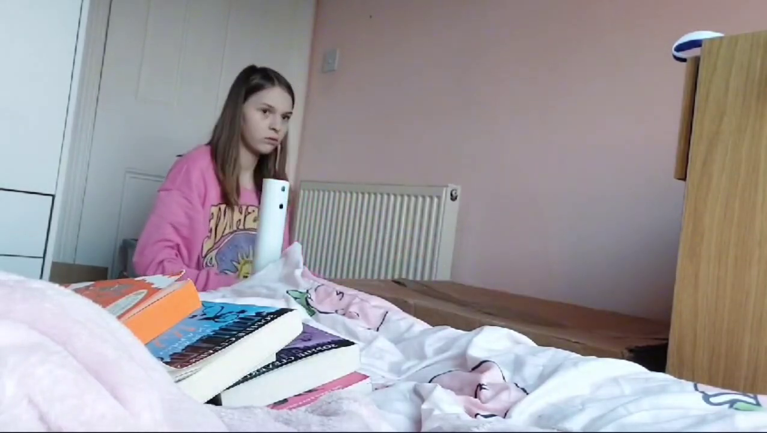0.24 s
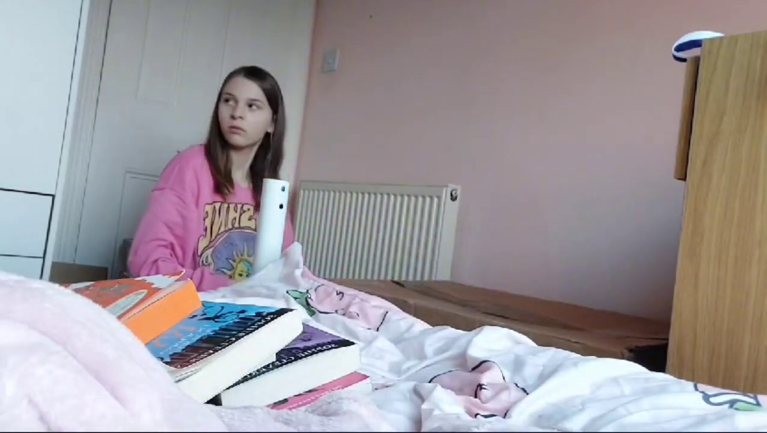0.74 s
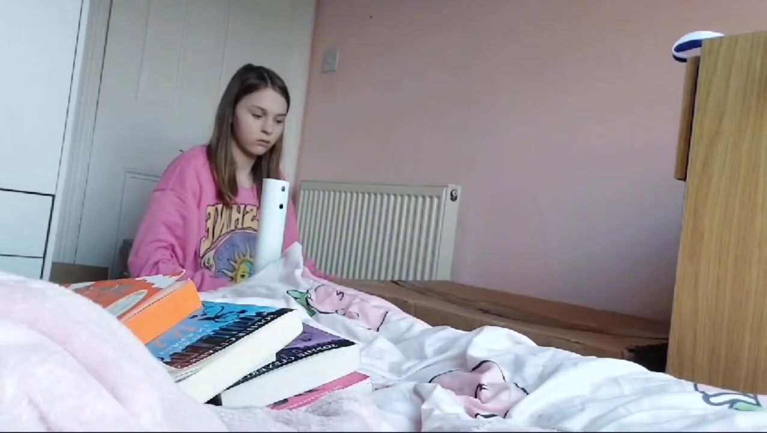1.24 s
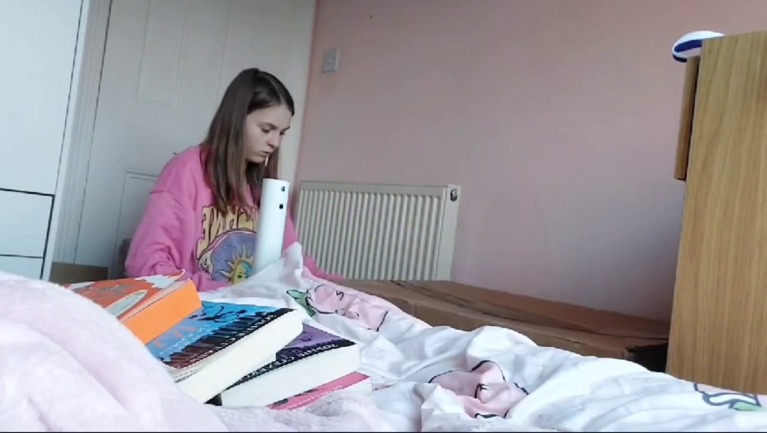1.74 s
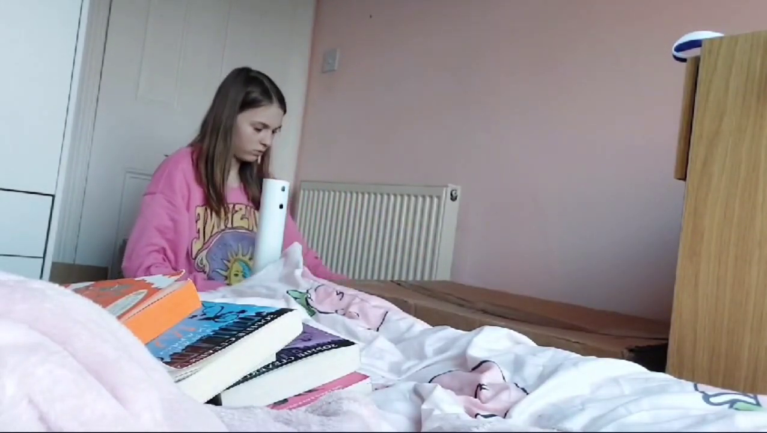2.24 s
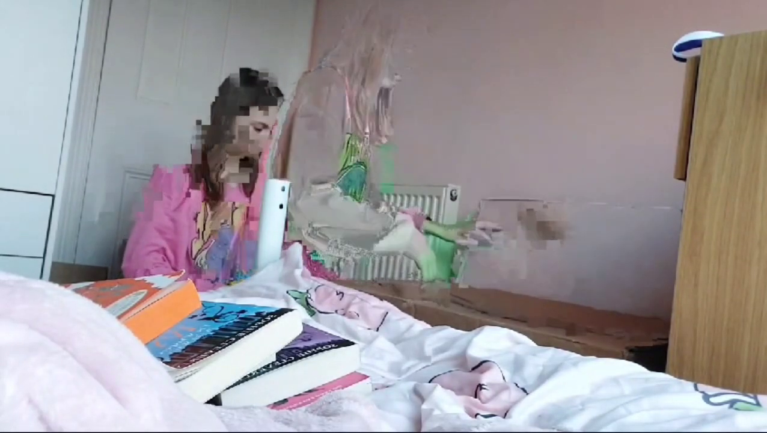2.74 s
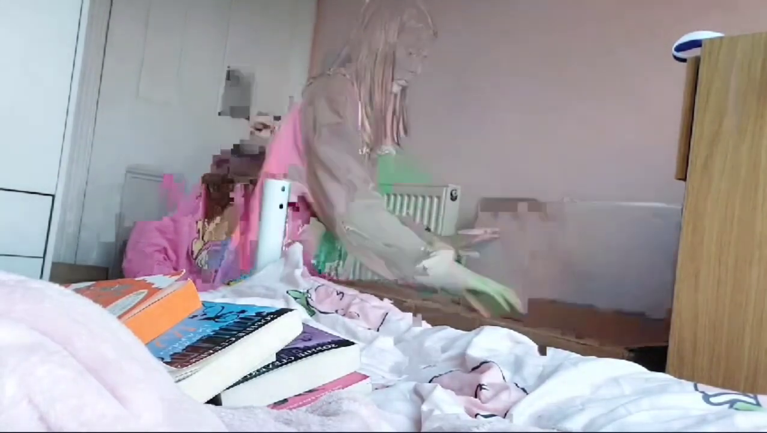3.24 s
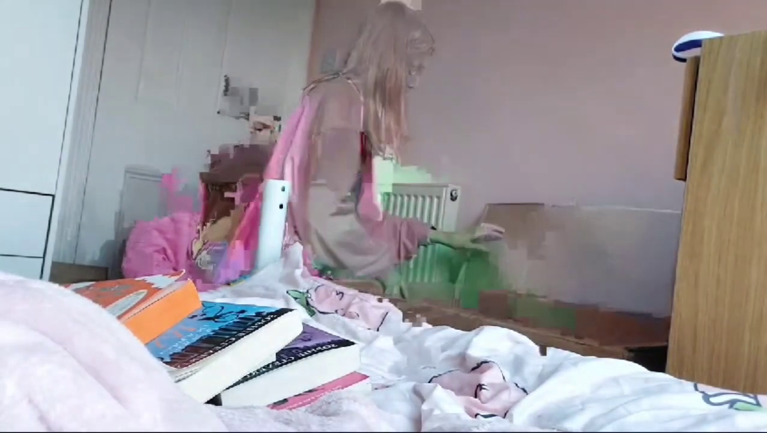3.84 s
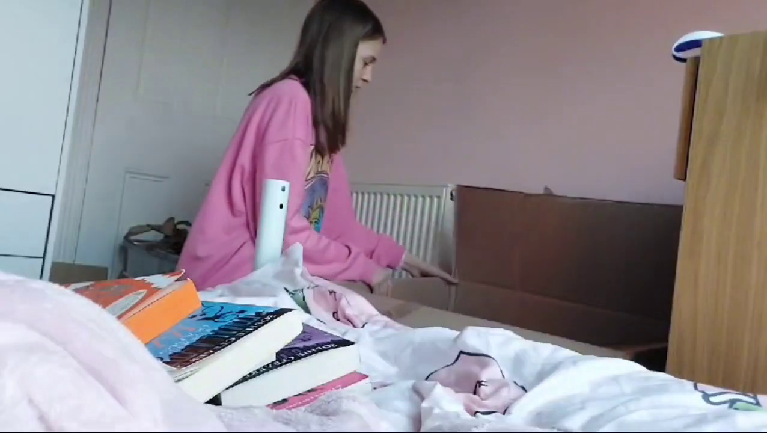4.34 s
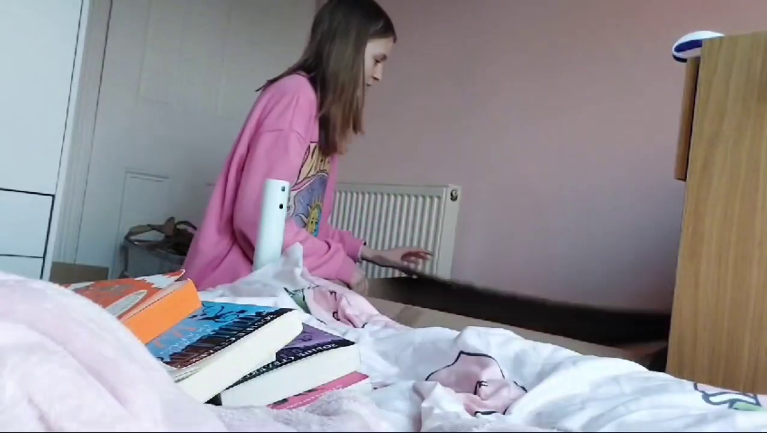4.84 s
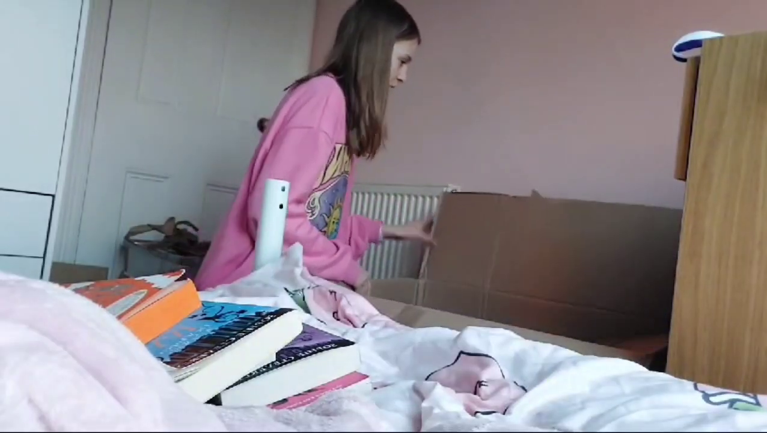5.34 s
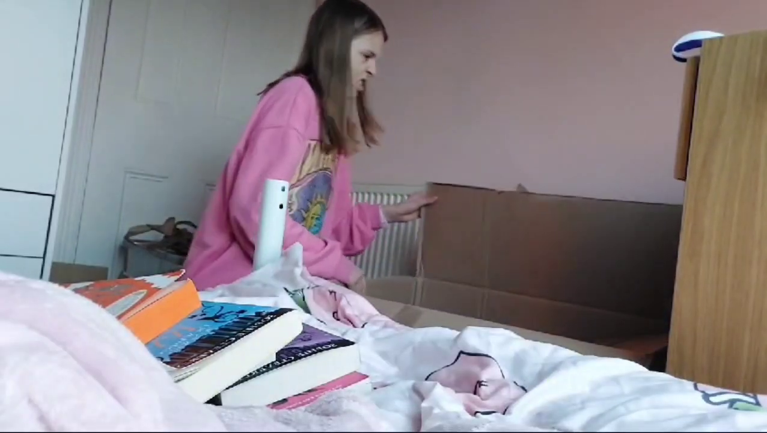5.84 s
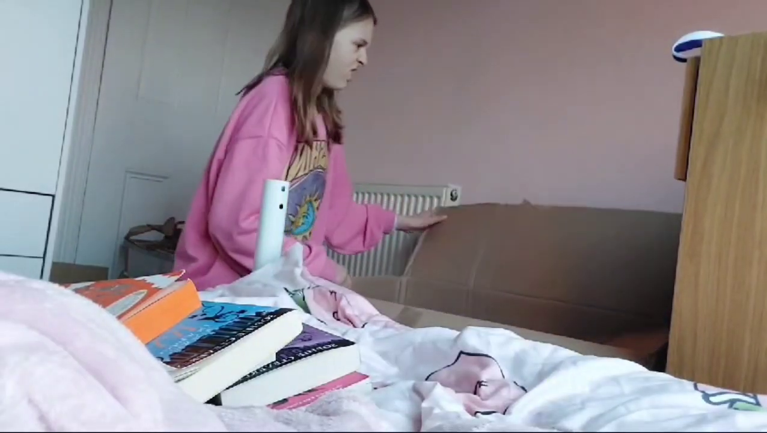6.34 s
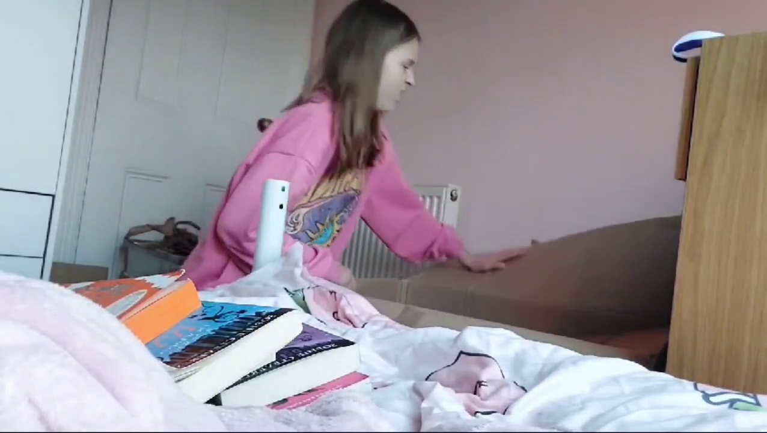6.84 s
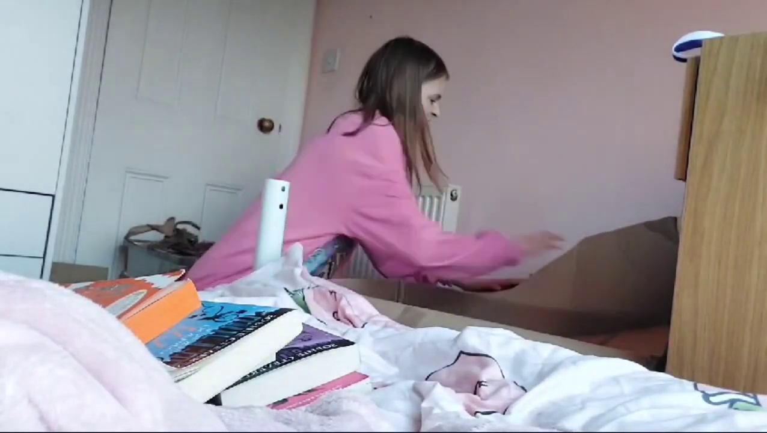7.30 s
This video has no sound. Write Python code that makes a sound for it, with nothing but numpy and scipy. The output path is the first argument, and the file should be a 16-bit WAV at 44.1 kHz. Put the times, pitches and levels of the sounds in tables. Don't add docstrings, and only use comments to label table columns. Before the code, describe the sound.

Close stereo pickup from a bed in a small furnished bedroom. Stiff packing paper is dragged in loud, crackly bursts, with hollow knocks on cardboard, sharp crease snaps and tiny squeaks. The rustling thins to soft shuffles after a couple of seconds. Then palms push and fold large flaps of a box, giving low thumps, dull scrapes and deep air booms, over a faint room hush.

```python
import sys
import numpy as np
from scipy import signal
from scipy.fft import rfft, irfft, next_fast_len
from scipy.io import wavfile
from scipy.ndimage import uniform_filter1d

SR = 44100
rng = np.random.default_rng(int(sys.argv[2]) if len(sys.argv) > 2 else 0)


def pcm_store(signal):
    levels = np.round(np.clip(np.atleast_2d(signal), -1, 1) * 32767)
    wavfile.write(sys.argv[1], SR, levels.astype(np.int16).T)


def volts_from_decibels(level):
    exponent = np.asarray(level, float) / 20
    return 10 ** exponent


N = 333837

SPLICES = [round(s * SR) for s in (1.8315, 2.109, 4.969)]
# peak t/s, flap level/dB, air level/dB, 20 dB rise t/s, 20 dB fall t/s
PULLS = [(0.0, -36.5, -29, 2.5, .1), (.112, -27.5, -38, -0.03, 0.36), (.165, -33, -28, -0.04, 0.2),
         (.24, -20, -30.5, 0.07, 0.15), (.29, -27, -20, 0.03, 0.17), (.33, -30.5, -18, 0.14, 0.2),
         (.525, -16, -32, 0.03, 0.09), (.575, -18.5, -32.5, 0.04, 0.16), (.765, -15.5, -26.5, -0.02, 0.13),
         (.96, -33.5, -30, .03, 0.25), (1.01, -18, -20, -0.02, 0.07), (1.045, -22, -24, -0.03, 0.16),
         (1.122, -15, -26.5, -0.01, 0.08), (1.197, -18, -23.5, -0.03, 0.05), (1.23, -23, -27.5, 0, 0.09),
         (1.45, -41, -41.5, 0.5, 0.6), (1.594, -27.5, -34, 0.23, 0.05), (1.75, -44, -38.5, 0.6, 0.28),
         (1.995, -26.5, -32.5, 0.09, 1), (2.095, -23.5, -24, 0.15, -4)]
FOLDS = [(2.311, -19.5, -25.5, 0.12, 0.14), (2.483, -21, -27.5, 0.022, .16), (2.64, -33, -31, 0.17, 0.092),
         (3.02, -37.5, -29.5, 0.045, 0.1), (3.27, -41, -46, 0.093, .05), (3.16, -49, -43, .05, 0.16),
         (3.314, -20, -11, 0.016, 0.086), (3.359, -37, -12.5, .05, 0.096), (3.56, -48, -42, 0.027, 0.15),
         (3.429, -38, -16.5, 0.15, 0.026), (3.88, -29.5, -26.5, 0.084, 1), (4.13, -30.5, -18.5, 0.13, 0.3),
         (4.22, -27.5, -21.5, 0.043, 0.12), (4.285, -14, -10, 0.023, 0.11), (4.42, -31, -25, 0.033, .15),
         (4.53, -26, -21, .15, 0.23), (4.645, -23.5, -18, 0.1, 0.15), (4.725, -27, -25, .06, .15),
         (4.79, -27.5, -29.5, .2, 0.035)]
PRESSES = [(5.0, -35.5, -26, 0.049, .1), (5.12, -17, -4.5, .06, 0.1), (5.43, -31, -32.5, 0.044, 0.3),
           (5.64, -21, -10, 0.22, 0.11), (5.775, -15.5, -19, 0.033, 0.089), (5.905, -24, -16, .06, 0.15),
           (6.03, -17.5, -10.5, 0.093, 0.11), (6.184, -17.5, -11, 0.022, 0.11),
           (6.52, -21.5, -11, .13, 0.06), (6.6, -22.5, -7, 0.046, 0.23), (6.78, -22, -37, 0.49, .1),
           (6.93, -14.5, -14.5, 0.16, 0.22), (7.065, -15, -22, 0.33, 0.15), (7.3, -31, -47, 0.27, 0.52),
           (7.396, -17.5, -1.5, .003, 0.082), (7.434, -23.5, -2.5, 0.026, 0.011), (7.47, -28, -28, .04, .2),
           (7.57, -20, -16.5, 0.23, .1)]


def evened(x):
    return x / np.sqrt(np.mean(x ** 2) + 1e-20)


def read(points, hz):
    f, value = np.transpose(points)
    return np.interp(np.log(hz + 1), np.log(f + 1), value)


def bins():
    return np.fft.rfftfreq(next_fast_len(N), 1 / SR)


def above(hz, edge_hz):
    return -10 * np.log10(1 + (edge_hz / (hz + 1e-3) + 1e-9) ** 8)


def coloured(x, db):
    size = next_fast_len(N)
    return irfft(rfft(x, size) * volts_from_decibels(db), size)[..., :N]


def resonate(x, hz, width):
    edges = [max(hz - width / 2, 10), min(hz + width / 2, 20000)]
    return signal.sosfilt(signal.butter(1, edges, "band", fs=SR, output="sos"), x)


def add(mix, s, sound):
    start = round(s * SR)
    end = min(k for k in SPLICES + [N] if k > start + 200)
    part = mix[:, start:end][:, :sound.shape[1]]
    part += sound[:, :part.shape[1]]


def slips(per_s, spread_db, smear_s):
    size = volts_from_decibels(spread_db * np.minimum(rng.exponential(1, N), 4)) * (rng.random(N) < per_s / SR)
    keep = np.exp(-1 / (smear_s * SR))
    power = signal.lfilter([1], [1, -keep], size ** 2, zi=[per_s * smear_s * 4])[0]
    return evened(np.sqrt(power + 1e-6) * rng.standard_normal((2, N)))


def patchy(x, patch_db):
    z = signal.stft(x, nperseg=256)[2]
    field = uniform_filter1d(rng.standard_normal(z.shape[1:]), size=5, axis=0)
    field = uniform_filter1d(field, size=14, axis=1)
    return signal.istft(z * volts_from_decibels(patch_db * evened(field)), nperseg=256)[1][:, :N]


def effort(rows, axis, lag_s=0):
    t, rows = np.arange(0, N + 32, 32) / SR, np.array(rows)
    peak = rows[:, :1] + lag_s
    rise, fall = np.maximum(rows[:, -2:].T[..., None], .002)
    db = rows[:, axis, None] - 20 * np.maximum((peak - t) / rise, (t - peak) / fall)
    own = np.searchsorted(SPLICES, t * SR) == np.searchsorted(SPLICES, peak * SR)
    gain = np.sqrt((own * volts_from_decibels(2 * db)).sum(0) + 1e-9)
    return np.interp(np.arange(N) / SR, t, gain)


def sheets():
    # f/Hz, level/dB per Hz
    sheet_colour = [(530, -4.5), (900, 3), (1210, 1), (1960, -0.5), (2970, -9), (3590, -3.5), (3960, -5),
                    (5330, -2.5), (6010, -7), (7270, -4), (9010, -18), (11900, -6), (15600, -11.5)]
    # peak t/s, level/dB, top octave/dB, 20 dB rise t/s, 20 dB fall t/s
    drag_strokes = [(0.0, -31.5, -26, .05, 0.1), (.268, -29, -24, 0.09, 0.08),
                    (.15, -39.5, -41.5, 0, 0.05), (.225, -28.5, -22.5, 0, 0.14),
                    (.36, -42, -36.5, 0.1, 0.1), (.465, -33, -23.5, .025, -0.1), (.503, -30, -26, .03, .2),
                    (.519, -20, -18, .005, 0.31), (.618, -15.5, -24, 0.0552, 0.16),
                    (.768, -23, -23.5, 0.03, 0.13), (.88, -35.5, -35.5, 0.26, .1),
                    (.955, -29, -30, 0.025, 0.1), (1.008, -16, -15.5, .006, 0.08),
                    (1.06, -22, -32, 0.06, 0.16), (1.122, -21.5, -22.5, 0.02, 0.17),
                    (1.2, -21.5, -22, 0.04, -0.01), (1.23, -20.5, -23.5, 0.08, 0.1),
                    (1.4, -39, -44.5, -1.8, 0.35), (1.53, -33, -37, 0.3, 0.15),
                    (1.578, -23, -25.5, 0.06, 0.12), (1.47, -36, -35.5, -0.6, 0.26),
                    (1.74, -44, -43.5, -3, 0.03), (1.852, -45.5, -46, 1.5, 0),
                    (1.98, -25.5, -28, 0.08, 3.5), (2.1, -22, -20, 0.08, 11),
                    (2.17, -39.5, -39.5, -0.16, 0.21), (2.26, -35, -37.5, 0.16, 0.14),
                    (2.32, -34.5, -39.5, -0.03, 0.09), (2.39, -36, -40, .1, 0.07),
                    (2.5, -36, -43.5, 0.07, 0.165), (2.63, -40.5, -37, 0.3, 0.15),
                    (2.78, -59, -53, .2, .1),
                    (3.16, -65, -57, 0.06, 0.5), (3.68, -60, -57, .06, 1), (3.27, -47, -48, 0.1, 0.2),
                     (3.319, -45, -45, 0.03, 0.13), (3.4, -50, -51, 0.1, .05), (3.815, -46.5, -43, 0.03, 1),
                     (4.0, -31.5, -33.5, 0.1833, 0.18), (4.28, -33, -34.5, 0.08, 0.36),
                     (4.5, -34.5, -40, 0.37, 0.38), (4.7, -32, -33.5, 0.28, 0.12),
                     (4.805, -36, -37, 0.42, 0.02), (4.865, -44, -49, .1, .08), (4.972, -44, -50, 0, .12),
                     (5.12, -37, -37, 0.15, 0.14), (5.285, -50, -53, .2, .05),
                     (5.391, -49, -37.5, 0.04, 0.4), (5.44, -38.5, -42.5, 0.02, 0.3),
                     (5.6, -32, -31.5, 0.05, 0.18), (5.7, -25.5, -33, 0, 0.06),
                     (5.83, -35.5, -39.5, 0.1, 0.24), (6.0, -35.5, -39, 0.2, 0.4),
                     (6.185, -39, -37.5, 0, 0.2), (6.245, -31.5, -30.5, 0.07, .07),
                     (6.32, -42.5, -41, -0.6, 0.5), (6.42, -39, -41, 0.08, 1.1),
                     (6.52, -27.5, -26.5, 0.05, 0.3), (6.6, -29, -27.5, 0.18, 0.23),
                     (6.92, -23.5, -23.5, 0.14, .2), (7.04, -23, -27.5, 0.24, 0.2),
                     (7.15, -35.5, -42, 0.7, 0.12), (7.3, -38.5, -41, .1, 0.3), (7.4, -48, -43, .2, .2),
                     (7.53, -32, -37.5, 0.11, 1)]
    coarse_db, coupling = -0.5, 0.37
    hz = bins()
    colour = read(sheet_colour, hz)
    fine = slips(per_s=1200, spread_db=3.2, smear_s=.006)
    fine = fine + volts_from_decibels(-16) * slips(per_s=90, spread_db=4.0, smear_s=.0009)
    fine = patchy(fine, patch_db=1.5)
    rough = patchy(slips(per_s=320, spread_db=1.5, smear_s=0.0025), patch_db=3.5)
    coarse = evened(coloured(fine + rough, colour + above(2860, hz)))
    middle = evened(coloured(fine, colour + above(hz, 2570) + 2 * above(9350, hz)))
    top = evened(coloured(fine, colour + 2 * above(hz, 7800)))
    strokes = drag_strokes
    drag = effort(strokes, axis=1)
    flexing = effort(PULLS + FOLDS + PRESSES, axis=1)
    low = volts_from_decibels(coarse_db) * drag * (flexing / drag) ** coupling
    return drag * middle + effort(strokes, axis=2) * top + low * coarse


def walls(modes, push, per_s, spread_db, smear_s, steady_s, edge_hz):
    drive = slips(per_s, spread_db, smear_s)
    ring = np.zeros((2, N))
    for hz, width, db in modes:
        ring += volts_from_decibels(db) * evened(resonate(resonate(drive, hz, width), hz, 2.0 * width))
    pressure = np.sqrt(abs(uniform_filter1d(ring ** 2, round(steady_s * SR))) + 1e-9)
    gain = uniform_filter1d(push, size=220)
    stiff = above(edge_hz, bins())
    return gain * evened(coloured(ring / pressure ** 0.62, stiff))


def flaps():
    # f/Hz, width f/Hz, level/dB
    flap_modes = [(327.5, 165, 7), (415, 217, 10.5), (485, 140, 7.5), (572, 107, 4.5), (752, 31, 0),
                  (880, 70, -7.5)]
    push = effort(PULLS + FOLDS + PRESSES, axis=1)
    return walls(flap_modes, push, per_s=140, spread_db=2.5, smear_s=0.016, steady_s=0.058, edge_hz=920)


def cavity():
    # f/Hz, width f/Hz, level/dB
    air_modes = [(70, 20, -2.5), (99.6, 32.4, 1.5), (134.4, 20, 0.5), (45, 25, -8.5), (192.6, 44.5, -1),
                 (234, 36.7, -5.5)]
    lean_on_s, lean_on_hz = 6.4, 90
    push = effort(PULLS + FOLDS + PRESSES, axis=2, lag_s=.003)
    air = walls(air_modes, push, per_s=45, spread_db=6.5, smear_s=0.013, steady_s=0.053, edge_hz=345)
    weight = np.clip((np.arange(N) / SR - lean_on_s) / .05, 0, 1)
    return (1 - weight) * air + weight * volts_from_decibels(0.3) * coloured(air, above(bins(), lean_on_hz))


def knocks():
    # t/s, peak level/dB, ring f/Hz, crunch over ring level/dB,
    # contact t/s
    box_knocks = [(0.101, -15, 767, -8, 0.0065), (0.11, -6.5, 597, -6.5, 0.0061),
                  (0.219, 0.5, 542, -11.5, 0.014), (0.237, 5, 566, -20, 0.0079),
                  (0.26, -5.5, 533, -8.5, 0.021), (0.46, -14.5, 118, -1, 0.013),
                  (0.516, 0.3, 485, -4.5, 0.021), (0.564, -9, 505.5, -10, 0.042),
                  (0.76, -4, 494, 1, 0.011), (1.004, -7, 464, 1.5, 0.028), (1.114, 3, 254, -5.5, 0.008),
                  (1.118, -3.5, 524, -13, 0.023), (1.19, -1.5, 254, -3, 0.0081),
                  (1.225, -6, 256, -1, 0.017), (1.568, -13, 120, -6.5, 0.0067), (2.018, -7, 591, -7, 0.02),
                  (2.096, -3, 720, -3, 0.025),
                  (2.476, -12, 417, -9.5, 0.022), (2.483, -6, 118, -21.5, 0.041),
                   (3.015, -20, 140, -20, .045), (3.298, -11, 331, -8.5, 0.025),
                   (3.31, -7, 204.6, -12, .05), (3.315, -3, 149.4, -22, .025), (3.33, -1, 75, -36, .05),
                   (3.875, -9.5, 223, -16, 0.016), (4.1, -8.5, 130, -10.5, 0.03),
                   (4.161, -5.5, 122, -18.5, .03), (4.273, 6, 148.4, -25, 0.024),
                   (4.626, -1, 219.6, -17.5, 0.0096), (4.982, -5, 140, -20, 0.008),
                   (5.088, 2, 230, -16.5, 0.0067), (5.566, 3.5, 234.6, -32.5, 0.013),
                   (5.612, -6.5, 231, -18.5, 0.016), (5.666, -1, 296, -9, .01),
                   (5.756, -5.5, 480, -21.5, 0.03), (5.893, -7, 347, -16.5, 0.017),
                   (6.003, -0.5, 194.4, -17.5, 0.015), (6.029, 0.5, 114.7, -5.5, 0.047),
                   (6.177, 0, 115, -12, 0.015), (6.421, -5, 189, -29, 0.022), (6.584, -9.5, 138, -8, 0.076),
                   (6.951, 2.5, 132.7, -13, 0.027), (7.396, -6, 141, -25.5, 0.009),
                   (5.005, -6, 140, -25, .025), (5.619, 0, 240, -8, .008), (6.469, -6, 135, -20, .03),
                   (6.49, -10, 590, -12, .035), (6.655, -2, 135, -15, .04), (6.74, -5, 310, -12, .03),
                   (6.848, -9, 620, -10, .035), (6.975, -2, 140, -8, .015), (7.05, -4, 140, -10, .04),
                   (4.279, -8, 490, -6, .015)]
    ratios = np.array([1, 0.91, 1.17, 1.9, 3.7])
    levels = volts_from_decibels(np.array([5, -14.5, -5, -10, -22]))[:, None]
    out, t = np.zeros((2, N)), np.arange(SR // 3) / SR
    for s, db, hz, crunch_db, contact in box_knocks:
        shape = volts_from_decibels(-60 * np.maximum(t - contact, 0) / 0.13) * np.minimum(t / 0.0022, 1)
        pitch = hz * ratios * rng.uniform(0.94, 1.04, 5) ** [0, 1, 1, 1, 1]
        phase = rng.random((2, 5, 1)) * [[[.15]], [[1]]]
        ring = (levels * np.sin(2 * np.pi * (pitch[:, None] * t + phase))).sum(1)
        crunch = rng.standard_normal((2, len(t)))
        for centre, width in [(600, 1100), (650, 710), (550, 900), (500, 800)]:
            crunch = resonate(crunch, centre, width)
        crunch = evened(crunch * volts_from_decibels(-60 * t / 0.69))
        add(out, s, volts_from_decibels(db - 15.5) * shape * (evened(ring) + volts_from_decibels(crunch_db) * crunch / 2))
    return out


def snaps():
    # t/s, peak level/dB, centre f/Hz
    crease_snaps = [(0.202, -11, 1550), (0.2673, -7, 11640), (0.451, -21.5, 8390), (0.5024, -24, 4960),
                    (0.5664, 4.5, 2290), (0.759, -1, 1920), (0.944, -11.5, 4570), (1.006, -1, 3670),
                    (1.114, -3, 3770), (1.198, 0, 1650), (1.4653, -16, 11900), (1.5476, -18, 4930),
                    (1.563, -5.5, 2720), (1.831, -25.5, 3830), (1.9538, -11, 1990), (2.029, -0.5, 1990),
                    (4.275, -20.5, 3020), (4.969, -22, 4500), (5.556, -9, 2100), (5.6048, -19, 7100),
                    (5.7, -19, 4700), (6.228, -11.5, 2110), (6.49, -8, 5140), (6.992, -8, 1880)]
    out, t = np.zeros((2, N)), np.arange(SR // 4) / SR
    for s, db, hz in crease_snaps:
        noise = rng.standard_normal((2, len(t)))
        fizz = evened(resonate(noise, hz, .5 * hz)) + volts_from_decibels(3.0) * evened(resonate(noise, 7700, 14000))
        add(out, s, volts_from_decibels(db - 22.0) * fizz * volts_from_decibels(-60 * t / 0.18) * np.minimum(t / 0.0046, 1))
    return out


def ticks():
    # t/s, peak level/dB, centre f/Hz
    fibre_ticks = [(0.0792, -26, 12500), (0.1473, -23.5, 7050), (0.2683, -4, 11600), (0.3592, -19.5, 12900),
                   (0.4595, -16, 8390), (0.5034, -10.5, 5090), (0.5168, -5, 1700), (0.7644, -5.5, 11800),
                   (0.9522, -11.5, 4550), (1.0076, -5, 3710), (1.1149, -12, 3680), (1.2005, -2.5, 3680),
                   (1.3992, -25.5, 4170), (1.4654, -15, 11800), (1.5687, -2.5, 12200), (1.924, -22.5, 3480),
                   (2.0283, -4.5, 12800), (2.2343, -18, 4150), (2.265, -16, 1150), (2.31, -15, 1300),
                   (2.376, -18, 2200), (3.8147, -28, 4100), (4.161, -26.5, 3400), (4.2747, -13, 3090),
                   (4.6917, -20, 11400), (4.8579, -28, 12000), (4.9764, -25, 5040), (5.1178, -17.5, 4000),
                   (5.1637, -25.5, 3450), (5.6051, -11, 7160), (5.7007, -9, 4710), (5.7644, -26, 3920),
                   (5.8162, -18, 5370), (5.912, -21.5, 5430), (6.0137, -17, 3490), (6.1764, -25, 5500),
                   (6.316, -21, 11700), (6.411, -17, 3350), (6.4957, -13.5, 5150), (6.883, -13.5, 3400),
                   (6.9186, -7.5, 6970), (7.2914, -28.5, 5300), (3.095, -42, 7000), (3.505, -41, 7300),
                   (3.664, -42, 11500), (4.969, -30, 8000)]
    t60_s, wide_db = 0.014, -2
    out, t = np.zeros((2, N)), np.arange(SR // 20) / SR
    for s, db, hz in fibre_ticks:
        noise = rng.standard_normal((2, len(t)))
        fizz = evened(resonate(noise, hz, 0.13 * hz)) + volts_from_decibels(wide_db) * evened(resonate(noise, 9000, 12000))
        add(out, s, volts_from_decibels(db - 8.5) * fizz * volts_from_decibels(-60 * t / t60_s) * np.minimum(t / 0.0013, 1))
    return out


def squeaks():
    # t/s, length t/s, f/Hz, width f/Hz, level/dB
    edge_sounds = [(0.496, 0.024, 5000, 400, -19), (0.459, 0.025, 8400, 600, -33),
                   (0.585, 0.039, 5120, 500, -21.5), (1.203, 0.071, 3580, 498, -21),
                   (1.258, 0.091, 3530, 670, -36), (2.097, 0.024, 6030, 10700, -18.5),
                   (0.096, 0.047, 1300, 590, -32), (3.005, 0.044, 630, 190, -44),
                   (3.225, .03, 1760, 200, -57), (4.0, .04, 950, 210, -30.5),
                   (3.81, 0.022, 3860, 700, -40.5), (5.6025, 0.0055, 7370, 650, -17.5),
                   (5.94, 0.05, 1800, 1700, -28), (6.997, 0.0021, 12940, 6980, -11.5),
                   (7, 0.071, 7070, 1500, -22.5), (3.135, .11, 7000, 1200, -54),
                   (5.705, .03, 5100, 700, -34), (5.362, .075, 4800, 3600, -39),
                   (7.285, .07, 1500, 1400, -34), (6.02, .08, 1500, 1500, -30)]
    out = np.zeros((2, N))
    for s, length, hz, width, db in edge_sounds:
        noise = rng.standard_normal((2, SR // 8))[:, :round(length * SR)]
        whistle = evened(resonate(resonate(noise, hz, width), hz, width))
        add(out, s, volts_from_decibels(db) * whistle * signal.windows.tukey(noise.shape[1], .5))
    return out


def bedroom(x):
    # f/Hz, T60 t/s
    room_decay = [(100, 0.17), (500, 0.13), (2000, 0.39), (6000, 0.27), (15000, 0.081)]
    taps = np.zeros((2, SR // 2))
    slots = np.arange(200, SR // 2 - 20, 20)
    at = slots + rng.integers(0, 20, (2, len(slots)))
    np.put_along_axis(taps, at, rng.choice([-1., 1.], at.shape), 1)
    hz, t, z = signal.stft(taps, SR, nperseg=256)
    tail = signal.istft(z * volts_from_decibels(-60 * t / read(room_decay, hz)[:, None]), SR, nperseg=256)[1]
    tail /= np.linalg.norm(tail[0])
    takes = np.split(x, SPLICES, axis=1)
    return np.hstack([signal.oaconvolve(take, tail, axes=1)[:, :take.shape[1]] for take in takes])


def hush():
    # f/Hz, level/dB per Hz
    hush_colour = [(18, -34), (30, -1), (130, -1), (192, -12.5), (263, -4), (333, -15), (456, -12),
                   (693, -27), (1030, -23), (1170, -30), (1640, -36), (2500, -44), (4940, -40.5),
                   (7500, -29.5), (8330, -39), (15600, -37)]
    noise = rng.standard_normal((2, N))
    return volts_from_decibels(-47.5) * evened(coloured(noise, read(hush_colour, bins())))


def scene():
    rub = sheets() + flaps() + cavity()
    hits = knocks() + snaps() + squeaks() + ticks()
    reflected = bedroom(volts_from_decibels(-12.5) * rub + volts_from_decibels(-10) * hits)
    return volts_from_decibels(-0.5) * rub + hits + reflected + hush()


def band_limit(x):
    return signal.sosfilt(signal.butter(12, 15760, fs=SR, output="sos"), x)


def record(dry):
    # f/Hz, correlation/1
    port_likeness = [(60, .95), (150, .94), (380, .88), (640, .7), (1000, .1), (1500, -.15), (3000, .03),
                     (15000, .01)]
    # f/Hz, left minus right level/dB
    port_lean = [(60, -.5), (200, -.5), (380, -6), (700, -6), (1290, -.3), (2400, 1), (4400, 3), (7000, -1),
                 (9000, -8.5), (12000, -5), (15000, -4.5)]
    size, hz = next_fast_len(N), bins()
    turn = np.arccos(np.clip(read(port_likeness, hz), -1, 1)) / 2
    common, apart = rfft(dry, size) * [np.cos(turn), np.sin(turn)]
    ports = np.array([common + apart, common - apart])
    ports = ports * volts_from_decibels(np.outer([.5, -.5], read(port_lean, hz)))
    low_cut = 1 / (1 + (40 / (hz + 1)) ** 4)
    x = irfft(ports * low_cut * volts_from_decibels(2.0 * (hz > 1100)), size)[:, :N]
    x = x / (1 + abs(x / .99) ** 10) ** (1 / 10)
    return band_limit(x)


dry = scene()
out = record(dry)
pcm_store(out)
```